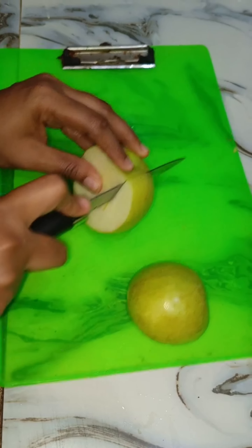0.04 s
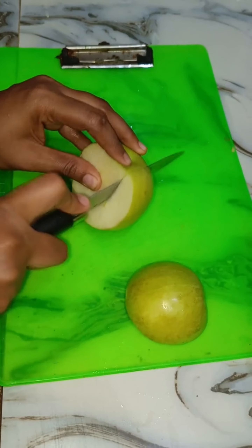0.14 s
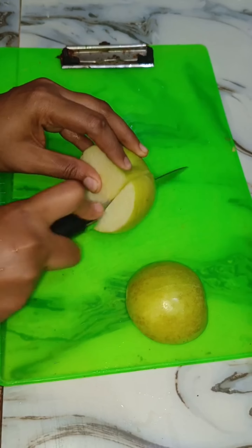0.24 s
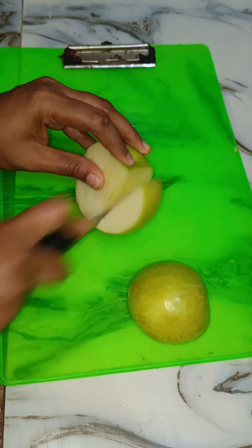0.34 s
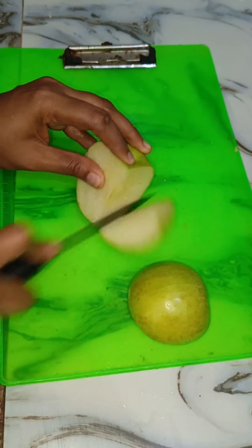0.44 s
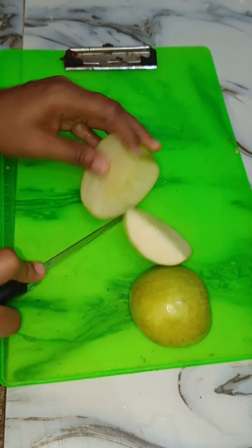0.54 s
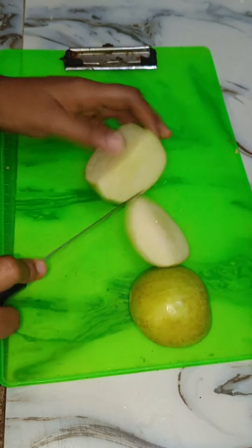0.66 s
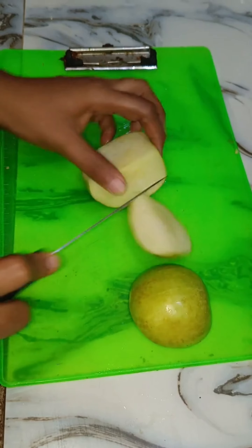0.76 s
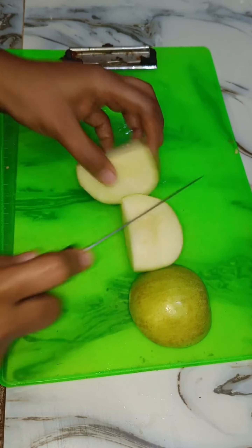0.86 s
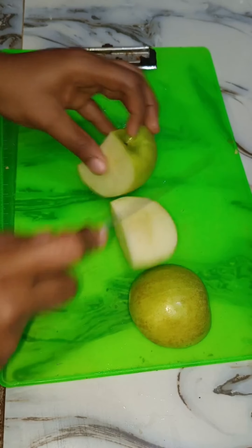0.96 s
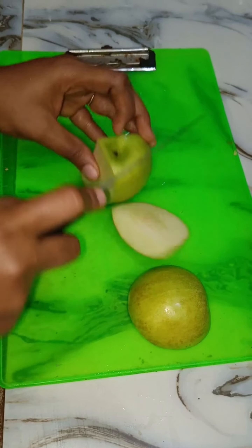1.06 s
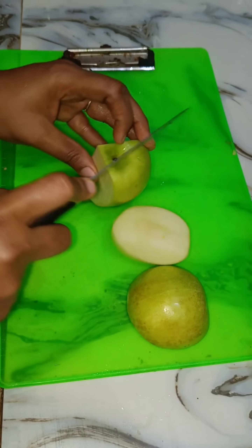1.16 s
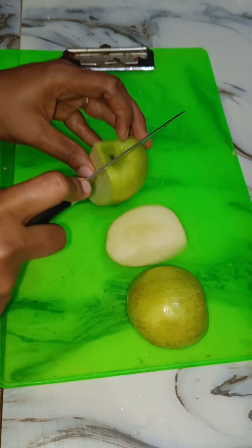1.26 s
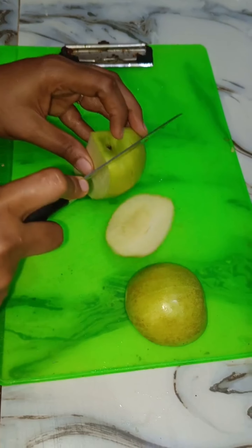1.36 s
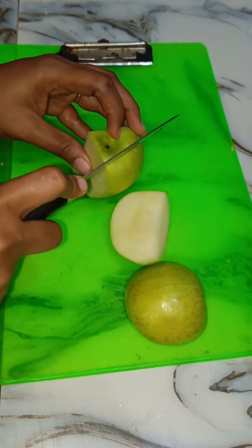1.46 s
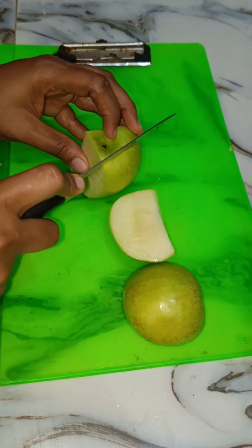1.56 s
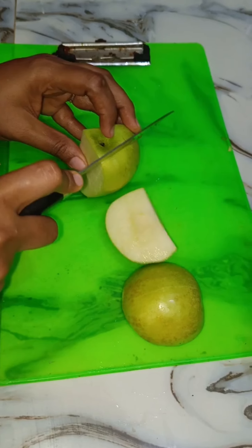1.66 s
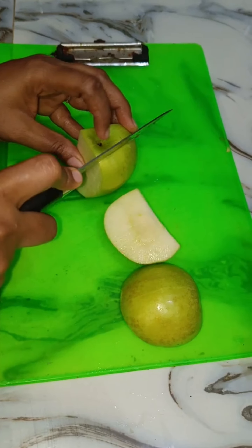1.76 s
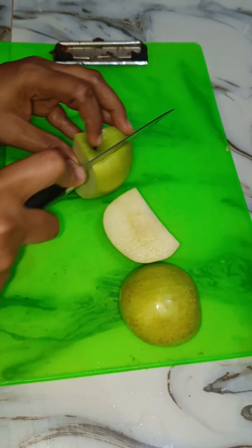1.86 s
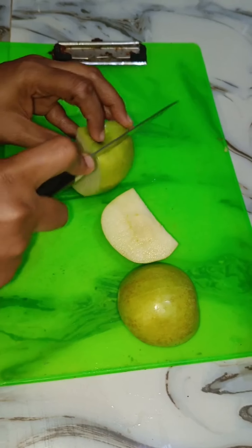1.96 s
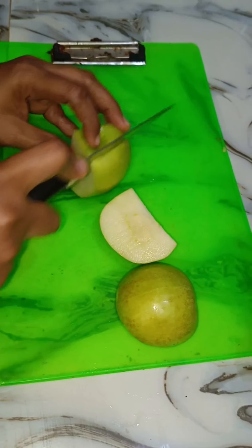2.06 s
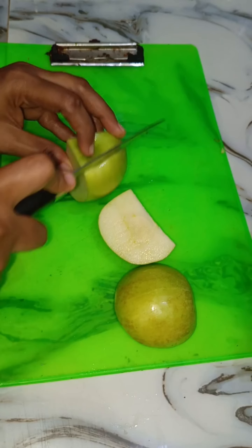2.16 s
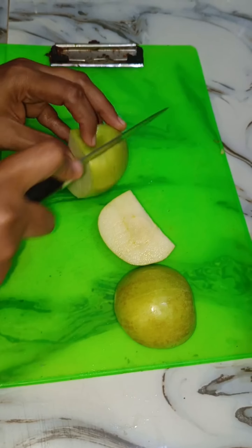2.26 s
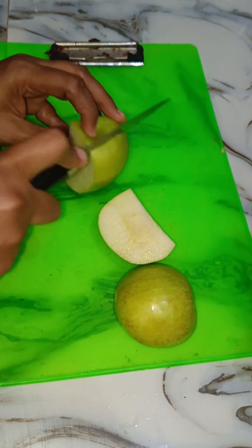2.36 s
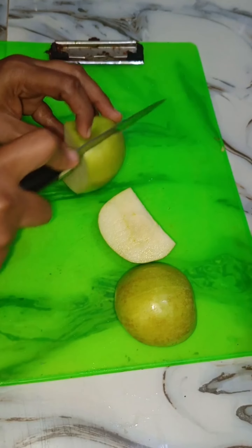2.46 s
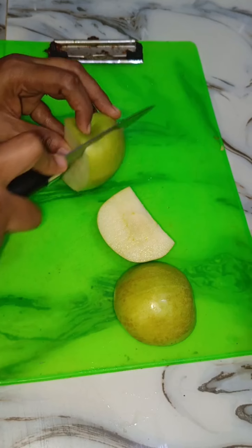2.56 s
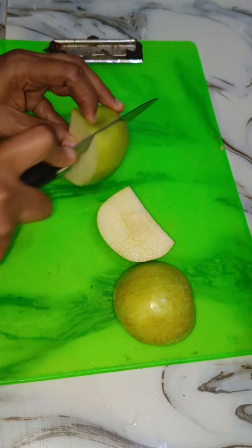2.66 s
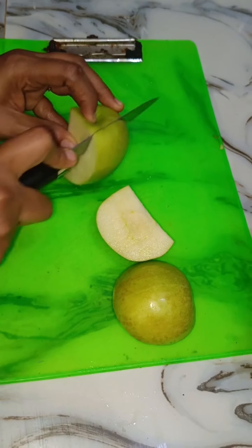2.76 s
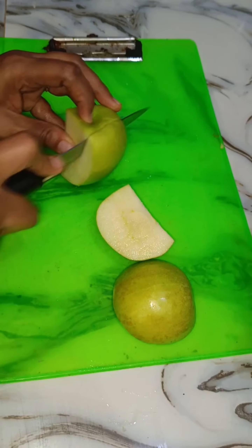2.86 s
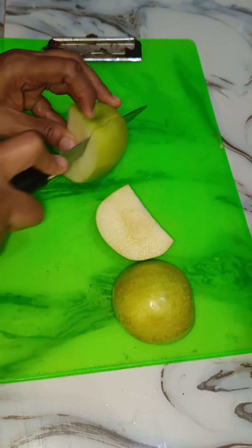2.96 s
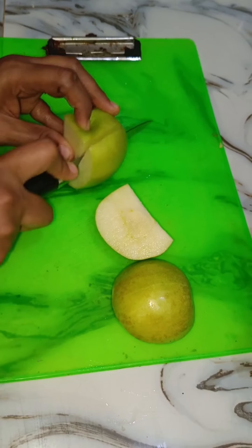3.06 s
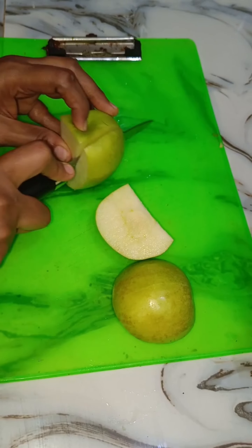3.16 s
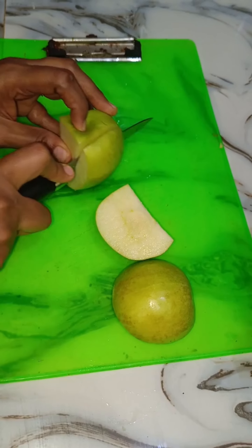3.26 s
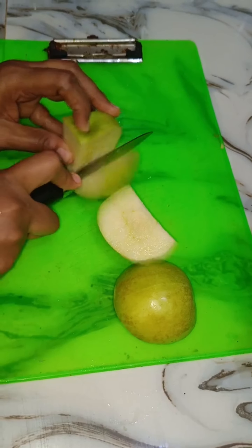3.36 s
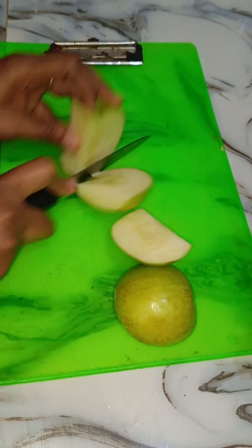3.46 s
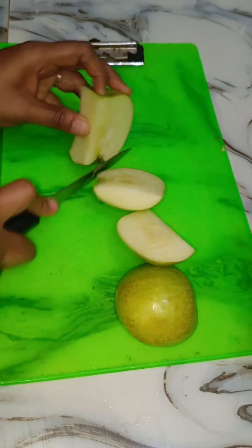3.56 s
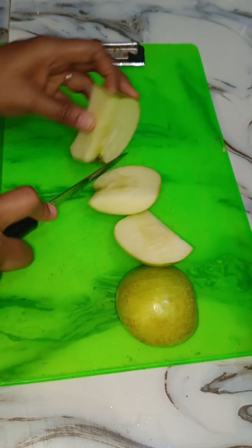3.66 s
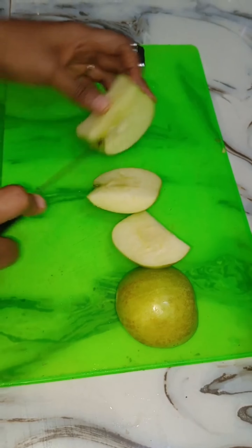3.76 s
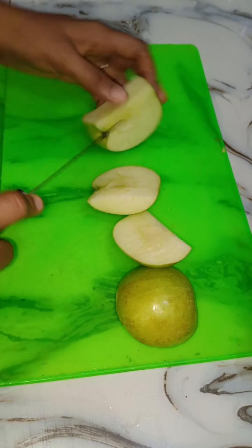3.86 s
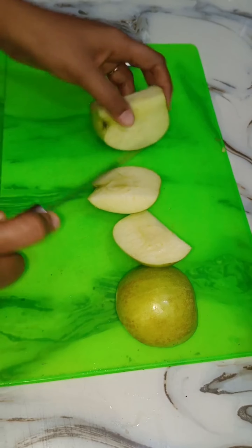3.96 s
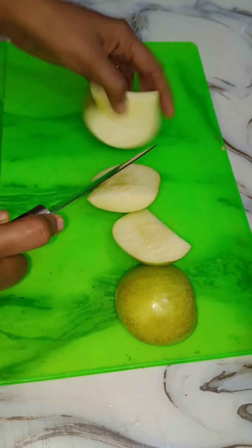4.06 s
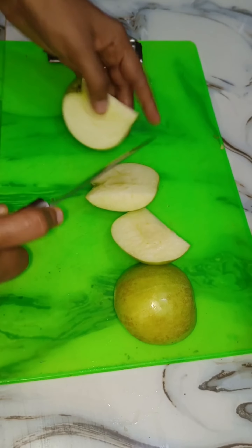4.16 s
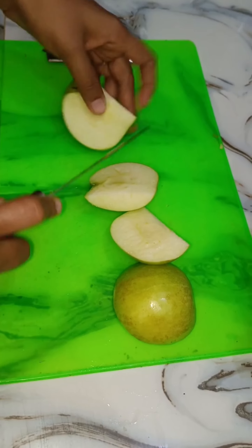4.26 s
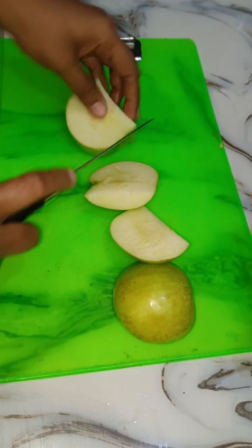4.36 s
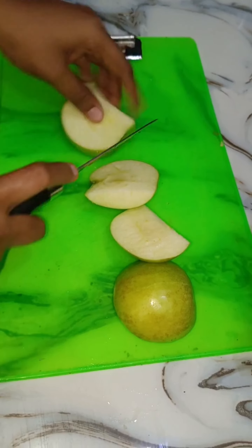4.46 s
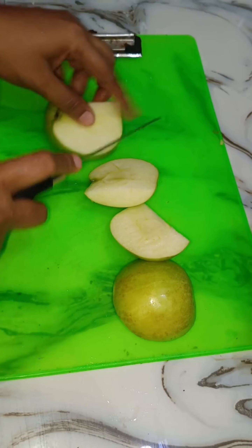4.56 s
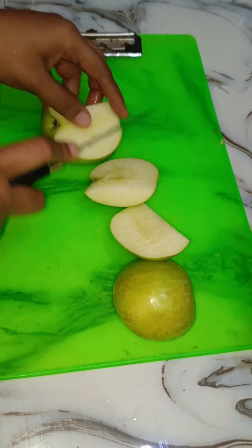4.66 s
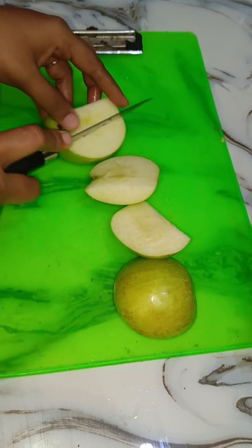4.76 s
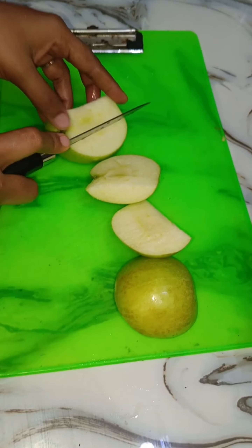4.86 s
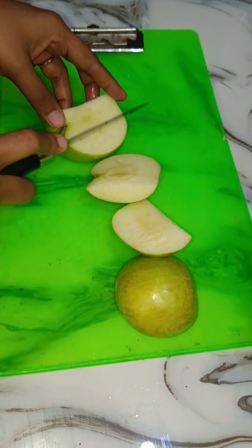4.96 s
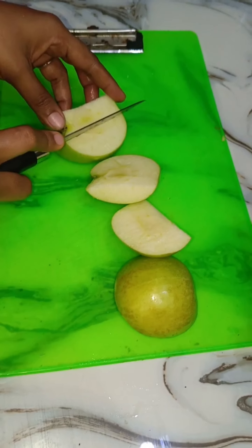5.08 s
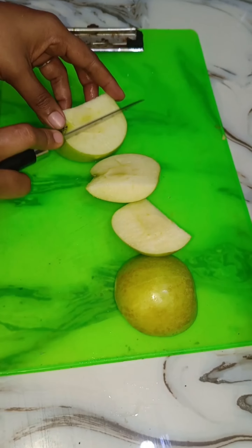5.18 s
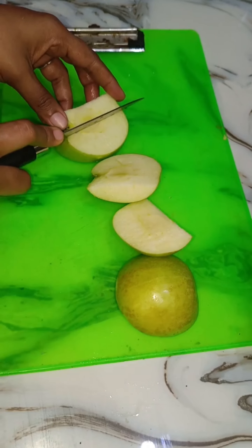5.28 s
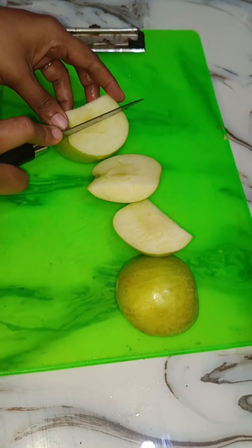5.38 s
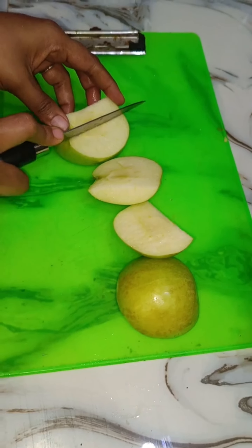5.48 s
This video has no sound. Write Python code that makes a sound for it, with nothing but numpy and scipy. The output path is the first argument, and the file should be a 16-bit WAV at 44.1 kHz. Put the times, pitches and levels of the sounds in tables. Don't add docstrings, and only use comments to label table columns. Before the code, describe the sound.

A knife crunches wetly through a crisp apple and slams a thin plastic board, with light taps and slides between cuts in a small kitchen.

```python
import sys
import numpy as np
from scipy import signal
from scipy.fft import rfft, irfft
from scipy.io import wavfile
from scipy.ndimage import uniform_filter1d

SR = 44100
rng = np.random.default_rng(int(sys.argv[2]) if len(sys.argv) > 2 else 0)


def store_wav(level_fs):
    pcm = np.round(np.clip(np.atleast_2d(level_fs), -1, 1) * 32767)
    wavfile.write(sys.argv[1], SR, pcm.T.astype(np.int16))


def to_linear_factor(level_db):
    exponent = np.asarray(level_db, float) / 20
    return 10 ** exponent


N = 243431


# (full pressure [s], fizz [dB], rise [s], fall [s], crunch over fizz [dB])
BLADE_PUSHES = [(0.002, -62, .01, 0.1, 11.5), (0.126, -56, .08, 0.047, 6), (0.174, -38.5, 0.036, 0.16, 2.5),
                (0.322, -40.5, 0.025, 0.025, 4), (0.34, -37.5, .025, 0.0016, 6),
                (1.833, -78, .2, 0.22, 11.5), (2.08, -65.5, .11, 0.16, 6.5), (2.225, -64, 0.055, 0.25, 4.5),
                (2.264, -53.5, .07, 0.066, 4.5), (2.426, -62.5, .06, 0.14, 5),
                (2.507, -50, .055, 0.046, 3.5), (2.651, -53.5, .2, 0.072, 5.5),
                (2.76, -62.5, .035, .1, 2.5), (2.824, -53, .12, 0.087, 4), (2.985, -40.5, 0.077, 0.069, -1),
                (3.016, -41.5, .07, 0.044, 1.5), (3.292, -56, .09, 0.051, 4), (3.308, -46, 0.012, 0.13, 1),
                (3.345, -33, .022, 0.0017, 1), (4.098, -71, 0.0098, .02, 17),
                (4.351, -45.5, .007, 0.035, 11), (4.36, -46.5, 0.012, 0.0083, 9.5),
                (4.696, -68, .06, 0.04, 5.5), (5.219, -77, .008, 0.063, -1), (5.275, -76, .008, 0.12, 8.5),
                (5.335, -65, 0.061, 0.86, 1), (5.48, -55, 0.13, 0.6, 2)]
# (frequency [Hz], density [dB per Hz])
CELL_FIZZ = [(180, -49), (300, -11.5), (800, -12), (1500, -6), (2900, -4), (4200, -1), (6000, -8),
             (7200, -12), (8500, -17), (13300, -25.5), (15200, -9), (16200, -16.5), (16700, -49)]
# (frequency [Hz], width [Hz], level [dB])
BLADE_RINGS = [(2010, 200, -4), (2760, 160, 0.5), (3560, 1700, -7.5), (6000, 140, -1)]


def cut():
    crunch_hz = 4000
    pushes = np.array([stroke(*row[:4], 1.227) for row in BLADE_PUSHES])
    crunch_share = to_linear_factor(np.array([row[4] for row in BLADE_PUSHES])) ** 2
    slow_noise = uniform_filter1d(uniform_filter1d(rng.standard_normal(N), 160), 160)
    jerks = to_linear_factor(1.4 * evened(slow_noise))
    clicks = grains(10000, 2.0) + 0.6 * grains(900, 3.0)
    burst = coloured(jerks * clicks, CELL_FIZZ)
    rings = 0
    for hz, width_hz, db in BLADE_RINGS:
        rings = rings + to_linear_factor(db) * signal.lfilter(*signal.iirpeak(hz, hz / width_hz, SR), burst)
    burst = burst + rings
    fizz = evened(band(burst, crunch_hz, 17000))
    crunch = evened(band(burst, 500, crunch_hz))
    return envelope(pushes.sum(0)) * fizz + envelope(crunch_share @ pushes) * crunch


# (frequency [Hz], density [dB per Hz])
CRACK_COLOUR = [(88, -32.5), (150, -10), (271, -7.5), (343, -9.5), (864, -13), (1310, -11), (1970, -9.5),
                (2310, -8), (2600, -10.5), (6420, -25), (8970, -47.5), (15300, -44.5), (16500, -40)]


def strike(peak_db, thud_db, tilt_db, spread_s, ping_db, loose):
    ring_hz = 2100
    t, hz = np.arange(4096) / SR, np.fft.rfftfreq(4096, 1 / SR)
    chance = rng.standard_normal((2, 4096))
    octaves_off = np.log2((hz + 1) / ring_hz)
    low_mids = 1 / (1 + (hz / 1100) ** 4)
    lift_db = tilt_db * np.log2(np.clip(hz, 1500, 9000) / 1500)
    lift_db += 0.5 * np.exp(-(octaves_off / 0.084) ** 2)
    lift_db += 0.92 * (thud_db + 15) * low_mids
    colour = rfft(coloured(1.0 * (t == 0), CRACK_COLOUR)) * to_linear_factor(lift_db)
    bending = np.exp(-2j * np.pi * 2 * spread_s * np.sqrt(2000 * hz))
    crack = irfft(colour * bending)
    scale = to_linear_factor(peak_db) / abs(crack).max()
    rattle = irfft(colour * bending * rfft(chance * np.exp(-t / 0.0033) * (t < 0.03)))
    ping = to_linear_factor(ping_db * np.exp(-(octaves_off / 0.5) ** 2))
    edge = irfft(ping * rfft(crack) / np.sqrt(1 + (hz / 4930) ** 4))
    if ping_db:
        edge = edge + 0.16 * np.roll(edge, round(0.0023 * SR))
        direct = scale * edge * panned(0.5)
    else:
        direct = placed(scale * edge, 0)[:, :len(t)]
    thud = to_linear_factor(peak_db + thud_db) * ring(315, 0.035, 0.00067, 4096 / SR)
    radiated = irfft(rfft(crack) * to_linear_factor(-2.5 * low_mids))
    return direct + placed(thud, 0)[:, :len(t)] + loose * scale * rattle, scale * radiated


def strikes(table, spread_s, ping_db, loose):
    near, sent = np.zeros((2, N)), np.zeros(N)
    for s, peak_db, thud_db, tilt_db, room_db in table:
        sound, crack = strike(peak_db, thud_db, tilt_db, spread_s, ping_db, loose)
        add(near, s - spread_s / 2, sound)
        add(sent, s - spread_s / 2, to_linear_factor(room_db) * crack)
    return near, sent


# (time [s], peak [dB], thud over peak [dB], tilt [dB per octave], room [dB])
HEAVY_BLOWS = [
    (0.3362, -12, -31, 0.5, 0.5),
    (0.339, -18, -32.5, 5, -9),
    (0.3525, -22.5, -31.5, -4, -7.5),
    (0.9954, -24.5, -24, -1.5, -2.5),
    (1.0148, -35, -10, 3, -7),
    (3.3437, -9.5, -26.5, 1.5, 3.5),
    (3.346, -17, -41.5, 3, -4.5),
    (3.3587, -13.5, -42, -4.5, -0.5),
    (4.3625, -20, -23, 2, -2),
    (4.369, -24, -19, -6.5, -15.5),
]


def blows():
    return strikes(HEAVY_BLOWS, 0.0014, 0, 0.18)


# (time [s], peak [dB], thud over peak [dB], tilt [dB per octave], room [dB])
LIGHT_TAPS = [(0.435, -27, -26, 20, -10), (0.48, -26.5, -12.5, 6.5, -7), (0.5433, -44.5, -9, -4, 0),
              (0.641, -43.5, -9, -6.5, -1), (0.7027, -44, 3, -8, -14), (0.7163, -45.5, -8.5, 3.5, 5.5),
              (0.732, -51, -11, -7, -20), (0.7705, -34, -19.5, 0, -2.5), (0.793, -42, -28, -6, -8),
              (0.8885, -39.5, -15, 0, -1.5), (1.482, -64, 1, -9, 9), (1.708, -58.5, -13, 12, -2.5),
              (2.2199, -58, -15.5, 2.5, 17), (2.4952, -53, -8.5, 11, 19), (2.9707, -34, -19, 13, -1),
              (3.6626, -56, -8, 1.5, 6), (3.787, -61, -3, -3.5, 8.5), (3.923, -41.5, -20.5, -3.5, -11),
              (4.1075, -39, -17.5, 0, -2.5), (4.1929, -42, -17, -0.5, -4.5), (4.277, -50, -16.5, -5, 2),
              (4.7589, -56, -15.5, 9.5, -7)]


def taps():
    return strikes(LIGHT_TAPS, 0.0015, 7, 0.07)


# (time [s], level [dB])
COUNTER_BOOMS = [
    (0.336, -49.5),
    (1.001, -44.5),
    (3.344, -31.5),
    (4.36, -71),
]


def booms():
    near = np.zeros((2, N))
    for s, db in COUNTER_BOOMS:
        add(near, s, to_linear_factor(db) * ring(139, 0.5, 0.02, 1.0))
    return near


# (time [s], peak [dB], frequency [Hz], time to fall 60 dB [s], left-right [dB])
SHORT_PINGS = [(.219, -36.5, 6500, .01, 16), (0.7047, -38, 4220, 0.0071, 16), (.729, -44, 1585, 0.044, -2),
               (.793, -51, 2100, .015, 0), (0.9215, -43, 920, 0.015, -6), (.9215, -44.5, 1690, 0.011, -2),
               (4.1072, -45, 6000, 0.0053, 2), (4.366, -53, 2300, .03, -6), (4.282, -60, 1420, .08, 0),
               (4.115, -54, 1400, 0.081, -2), (4.3632, -32, 2170, 0.014, -6),
               (0.9892, -32.5, 1050, 0.017, -11), (.9985, -22.5, 1770, 0.005, -26),
               (1.0, -50, 1210, 0.08, 6), (1.011, -39, 1610, 0.022, -16), (1.018, -46, 3400, 0.043, -17),
               (3.3395, -34.5, 6500, 0.011, 8), (3.3423, -9.5, 3900, 0.017, -9),
               (3.369, -29.5, 1700, .15, 4.5), (3.356, -28.5, 2330, .05, 2), (3.356, -35, 3560, .06, 0.5),
               (3.5, -60, 1000, 0.037, -5), (4.371, -49, 1282, .1, 7), (4.372, -49, 3600, 0.049, -2),
               (.345, -36, 1430, 0.1, -0.5), (0.346, -36.5, 1600, .1, 1)]


def pings():
    near, sent = np.zeros((2, N)), np.zeros(N)
    for s, peak_db, hz, t60, pan_db in SHORT_PINGS:
        sound = to_linear_factor(peak_db) * ring(hz, t60, 0.00079, 0.3)
        add(near, s, placed(sound, pan_db))
        add(sent, s, to_linear_factor(-3) * sound)
    return near, sent


# (time [s], peak [dB], frequency [Hz], time to fall 60 dB [s], left-right [dB])
FRUIT_KNOCKS = [
    (0.51, -35, 300, 0.022, 2),
    (0.63, -36, 575, 0.054, -3),
    (0.702, -50, 315, 0.033, -3),
    (0.9211, -35, 300, 0.015, -2),
    (0.99, -37, 700, 0.015, -10),
    (1.644, -48, 1130, 0.035, 5),
    (.337, -27.5, 561.6, 0.027, -4),
    (4.3625, -29.5, 1032, 0.036, -9),
]


def knocks():
    near, sent = np.zeros((2, N)), np.zeros(N)
    for s, peak_db, hz, t60, pan_db in FRUIT_KNOCKS:
        sound = ring(hz, t60) + 0.13 * ring(hz * 2.0, t60 * 0.29) + 0.41 * ring(hz * 1.7, t60 * 0.34)
        add(near, s, placed(to_linear_factor(peak_db) * sound, pan_db))
        add(sent, s, to_linear_factor(10.5 + peak_db) * ring(hz, 0.002))
    return near, sent


def hits():
    near, sent = map(sum, zip(blows(), taps(), knocks(), pings()))
    return near + booms() + to_linear_factor(2.5) * kitchen(sent)


# (full speed [s], level [dB], rise [s], fall [s])
BOARD_SLIDES = [(.4, -45, .01, 0.26), (0.478, -37, 0.0078, 0.071), (0.635, -50, 0.0093, 0.077),
                (0.704, -46, .005, 0.16), (.768, -49, 0.0063, 0.091), (.884, -47, 0.057, 0.06),
                (0.931, -48, .012, 0.12), (0.992, -48, 0.024, 0.0043), (3.62, -73.5, .01, 0.24),
                (3.666, -66.5, 0.039, 0.1), (3.728, -61.5, 0.049, 0.18), (4.42, -47.5, 0.011, 0.25),
                (4.64, -64.5, 0.086, 0.18), (4.759, -63.5, 0.07, 0.11)]
# (frequency [Hz], density [dB per Hz])
RUB_COLOUR = [(240, -50), (400, -40), (1030, -10.5), (1600, -11), (2220, -14), (3650, -11.5), (4750, -20),
              (5640, -28), (15000, -63), (16500, -40.5)]
# (frequency [Hz], level [dB], time to fall 60 dB [s])
BOARD_RINGS = [(1530, -2.5, 0.045), (1740, -16, 0.03), (2300, -47, 0.015), (2800, 12, 0.035),
               (3380, 3, 0.05)]


def slide():
    slips = grains(5000, 3.5)
    board_ring = sum(to_linear_factor(db) * ring(hz, t60) for hz, db, t60 in BOARD_RINGS)
    board = signal.oaconvolve(slips, board_ring)[:N]
    rasp = evened(coloured(slips, RUB_COLOUR)) + 0.25 * evened(board)
    speed = envelope(sum(stroke(*row, 0.68) for row in BOARD_SLIDES))
    return speed * evened(rasp)


# (start [s], length [s], frequency [Hz], width [Hz], level [dB])
FRUIT_DRAGS = [(.14, .16, 213, 82, -64), (3.03, 0.12, 138, 30, -63.5), (3.54, 0.053, 4400, 2200, -78.5),
               (4.492, 0.11, 5500, 2200, -75), (0.49, 0.084, 245, 170, -54.5),
               (0.47, 0.048, 550, 220, -63.5), (.72, 0.04, 1560, 200, -54), (0.85, 0.16, 256, 130, -63.5),
               (1.64, .2, 520, 90, -77), (2.215, .09, 750, 370, -68), (4.44, .1, 2750, 150, -63),
               (4.645, .08, 3450, 350, -71), (4.84, .09, 3500, 29, -78), (4.605, 0.11, 1400, 400, -69.5),
               (4.71, .11, 1350, 400, -72), (4.183, .03, 1070, 290, -68), (5.13, 0.12, 120, 26, -56),
               (3.77, .05, 107, 32, -60)]


def drags():
    return held_noise(FRUIT_DRAGS)


# (start [s], length [s], frequency [Hz], width [Hz], level [dB])
SQUEAKS_AND_RASPS = [(4.49, .045, 2780, 150, -71), (4.545, .035, 2700, 140, -75), (4.664, .018, 3390, 250, -75),
                     (4.685, .035, 2950, 700, -77), (4.74, .05, 2700, 300, -81), (4.825, .1, 3490, 60, -84),
                     (4.49, .07, 3500, 200, -78), (2.02, .11, 2870, 160, -73), (2.045, .08, 1700, 400, -71),
                     (1.81, .05, 3000, 600, -78), (3.31, .028, 1000, 300, -62), (3.322, .018, 3300, 500, -53),
                     (3.305, .03, 4700, 700, -56), (2.6, .05, 2050, 90, -68), (2.96, .08, 3200, 200, -58),
                     (4.64, .08, 3500, 300, -80), (4.11, .03, 1800, 1400, -64), (4.37, .06, 750, 400, -56),
                     (4.37, .045, 3600, 1600, -51), (2.75, .11, 6300, 900, -64), (2.74, .12, 2900, 300, -66),
                     (2.495, .03, 6200, 700, -60), (3.93, .04, 1700, 900, -74), (.165, .09, 4000, 1200, -55),
                     (4.52, .1, 3000, 1500, -72), (4.203, .025, 2600, 2200, -68), (2.97, .06, 6000, 900, -56),
                     (4.455, .018, 2750, 200, -66), (4.183, .008, 1100, 500, -63)]


def squeaks():
    return held_noise(SQUEAKS_AND_RASPS)


# (frequency [Hz], time to fall 60 dB [s])
KITCHEN_FADE = [(200, 0.46), (700, 0.17), (1700, 0.27), (3000, 0.24), (6000, 0.22), (12000, 0.22)]


def kitchen(x):
    echoes = np.zeros((2, SR // 2))
    slots = np.arange(60, SR // 2 - 20, 12)
    at = slots + rng.integers(0, 12, (2, len(slots)))
    np.put_along_axis(echoes, at, rng.choice([-1.0, 1.0], at.shape), 1)
    hz, t, z = signal.stft(echoes, SR, nperseg=128)
    apart = 1 / (1 + (300 / (hz[:, None] + 1)) ** 2)
    z[1] = apart * z[1] + np.sqrt(1 - apart ** 2) * z[0]
    fade = to_linear_factor(-60 * t / read(KITCHEN_FADE, hz)[:, None])
    next_room = to_linear_factor(-23.5 - 60 * t / 0.64)
    tail = signal.istft(z * (fade + next_room), SR, nperseg=128)[1]
    before_walls = np.clip((0.012 - np.arange(tail.shape[1]) / SR) / 0.002, 0, 1)
    tail = tail * to_linear_factor(-6 * before_walls)
    return signal.fftconvolve(x[None], tail / np.linalg.norm(tail[0]), axes=1)[:, :N]


# (time [s], level [dB])
HUM_LEVEL = [(0.0, -56.5), (0.6, -57.5), (0.91, -56.5), (2.06, -66), (2.139, -52), (2.37, -55), (2.42, -64),
             (2.63, -66.5), (2.69, -56.5), (3.23, -69), (3.43, -58), (4.26, -67), (4.41, -57),
             (4.63, -73.5), (4.86, -58.5), (4.89, -74.5), (5.23, -55.5), (5.32, -69.5)]


def hum(hum_hz=102.1, width_hz=22):
    s, level_db = np.transpose(HUM_LEVEL)
    t = np.arange(N) / SR
    r = np.exp(-np.pi * width_hz / SR)
    wander = signal.lfilter([1], [1, -2 * r, r * r], rng.standard_normal((2, N)))
    sway = 1.8 + evened(wander[0]) + 1j * evened(wander[1])
    carrier = np.exp(2j * np.pi * hum_hz * t)
    return to_linear_factor(np.interp(t, s, level_db)) * evened((carrier * sway).real)


# (frequency [Hz], level [dB])
HORN_TONES = [(960, -84), (1437, -83.5), (1916, -86.5), (2121, -89.5)]


def horn(start_s=5.1, end_s=5.3):
    out, t = np.zeros(N), np.arange(0, end_s - start_s, 1 / SR)
    noise = rng.standard_normal((len(HORN_TONES), len(t)))
    waver = to_linear_factor(2.3 * evened(uniform_filter1d(noise, 1200)))
    tone = 0
    for (hz, db), w in zip(HORN_TONES, waver):
        tone = tone + np.sqrt(2) * to_linear_factor(db) * w * np.sin(2 * np.pi * hz * t)
    add(out, start_s, tone * signal.windows.tukey(len(t), 0.5))
    return out


# (frequency [Hz], density [dB per Hz])
ROOM_AIR = [(15, -80), (25, -47), (69, -8), (102, -10), (172, -18.5), (313, -18), (405, -31), (598, -27.5),
            (1200, -34.5), (1560, -70), (2640, -120)]
# (frequency [Hz], density [dB per Hz])
FINE_HISS = [(700, -27.5), (1200, -2), (2300, -5), (3500, -8.5), (5200, -11.5), (7000, -21.5), (8200, -27),
             (13500, -30.5), (15000, -19), (16100, -20), (16700, -44)]
# (frequency [Hz], likeness [0 to 1])
PORT_LIKENESS = [(25, .5), (60, 0.94), (150, 0.94), (380, 0.24), (950, 0.035), (2380, 0.027), (5980, 0.02),
                 (15000, 0.08)]


def air(spectrum, level_db):
    frames, hz = N // 256 + 5, np.fft.rfftfreq(1024, 1 / SR)
    a, b, c, d, patches = rng.standard_normal((frames, 513, 5)).T
    patches = evened(uniform_filter1d(uniform_filter1d(patches, 12, 0), 14, 1))
    same = read(PORT_LIKENESS, hz)[:, None]
    left, other = a + 1j * b, c + 1j * d
    z = np.array([left, same * left + np.sqrt(1 - same ** 2) * other])
    z *= to_linear_factor(read(spectrum, hz)[:, None] + 0.4 * patches)
    return to_linear_factor(level_db) * evened(signal.istft(z, nperseg=1024, noverlap=768)[1][:, :N])


def stroke(s, level_db, rise, fall, rounding):
    t = np.arange(0, N + 16, 16) / SR - s
    away = np.minimum(np.where(t < 0, -t / rise, t / fall), 4)
    return to_linear_factor(level_db - 29 * away ** rounding) ** 2


def envelope(power):
    return np.interp(np.arange(N) / 16, np.arange(len(power)), np.sqrt(power))


def grains(per_s, spread_db):
    size = to_linear_factor(spread_db * np.minimum(rng.exponential(1, N), 4))
    return size * rng.standard_normal(N) * (rng.random(N) < per_s / SR)


def held_noise(table):
    out = np.zeros(N)
    for s, length, hz, width_hz, db in table:
        noise = rng.standard_normal(round(length * SR))
        fuzz = evened(band(noise, hz - width_hz / 2, hz + width_hz / 2))
        swell = np.sqrt(2) * np.sin(np.linspace(0, np.pi, len(fuzz))) ** 0.45
        add(out, s, to_linear_factor(db) * fuzz * swell)
    return out


def ring(hz, t60, rise=0.00087, length=0.12):
    t = np.arange(round(length * SR)) / SR
    return to_linear_factor(-60 * t / t60) * np.sin(2 * np.pi * hz * t) * (1 - np.exp(-t / rise))


def evened(x):
    return x / np.sqrt(np.mean(x ** 2) + 1e-20)


def read(points, hz):
    f, value = np.transpose(points)
    return np.interp(np.log(hz + 1), np.log(f + 1), value)


def coloured(x, points):
    gain_db = np.maximum(read(points, abs(np.fft.fftfreq(4096, 1 / SR))), -100)
    response = np.exp(np.conj(signal.hilbert(np.log(to_linear_factor(gain_db)))))
    kernel = np.fft.ifft(response).real[:2048]
    kernel = kernel.reshape((1,) * (x.ndim - 1) + (-1,))
    return signal.oaconvolve(x, kernel, axes=-1)[..., :x.shape[-1]]


def band(x, lo_hz, hi_hz):
    return signal.sosfilt(signal.butter(3, [lo_hz, hi_hz], "band", fs=SR, output="sos"), x)


def add(mix, s, sound):
    part = mix[..., round(s * SR):][..., :sound.shape[-1]]
    part += sound[..., :part.shape[-1]]


def panned(pan_db):
    return to_linear_factor(np.array([[pan_db / 2], [-pan_db / 2]]))


def placed(sound, pan_db, lag=6):
    return np.array([np.pad(sound, (lag, 0)), np.pad(sound, (0, lag))]) * panned(pan_db)


def ported(pair, balance):
    left = coloured(pair[0], [(hz, db / 2) for hz, db in balance])
    right = coloured(pair[1], [(hz, -db / 2) for hz, db in balance])
    return np.array([left, right])


# (frequency [Hz], left-right [dB])
FRUIT_SHADE = [(700, 1.5), (1500, 1), (2100, -1), (2850, -5), (4000, 5), (6500, 4), (10000, -2.5),
               (15000, 2.5)]


def scene():
    fizz, rasp = cut(), slide()
    rubbing = ported(placed(fizz, 0)[:, :N], FRUIT_SHADE) + placed(rasp, 0)[:, :N]
    rubbing = rubbing + to_linear_factor(-8) * kitchen(fizz + rasp)
    fruit = placed(drags(), 0)[:, :N] + squeaks()
    background = air(ROOM_AIR, -63.5) + air(FINE_HISS, -77) + hum() + horn()
    return rubbing + hits() + fruit + background


def low_pass(x):
    return signal.sosfilt(signal.butter(12, 16840, fs=SR, output="sos"), x)


# (frequency [Hz], left-right [dB])
PORT_COLOUR = [(60, 0.5), (120, -2), (240, -1.5), (480, -5), (950, -3), (1890, -4.5), (3770, -2),
               (7520, 0.5), (15000, -17)]


def record(dry):
    dry = signal.sosfilt(signal.butter(2, 61.4, "high", fs=SR, output="sos"), dry)
    dry = signal.sosfilt(signal.cheby2(10, 50, 16550, fs=SR, output="sos"), dry)
    return low_pass(ported(dry, PORT_COLOUR))


dry = scene()
out = record(dry)
store_wav(out)
```